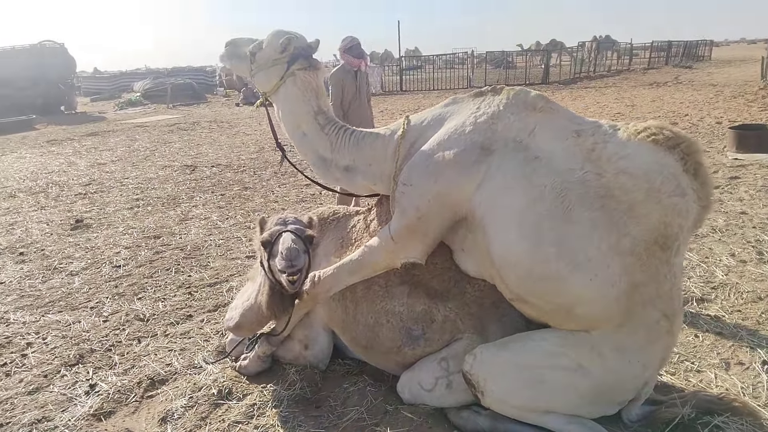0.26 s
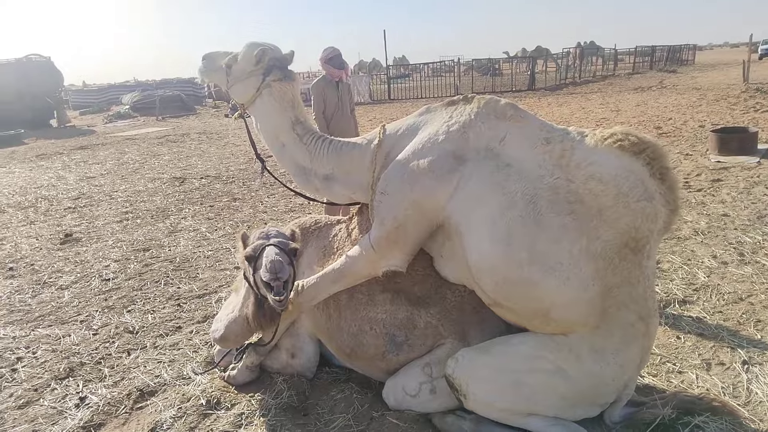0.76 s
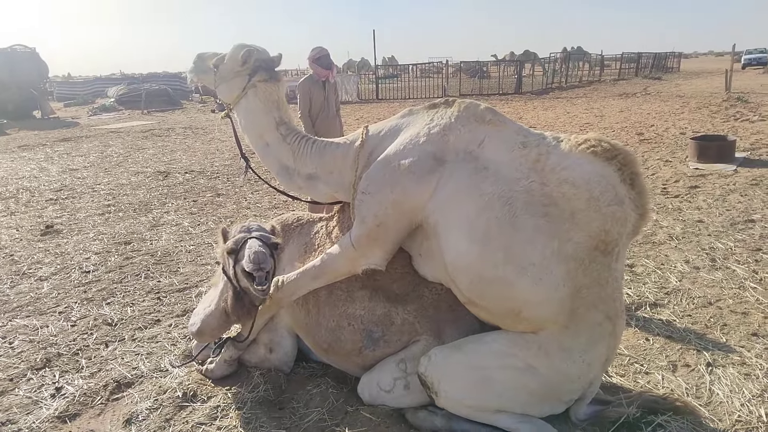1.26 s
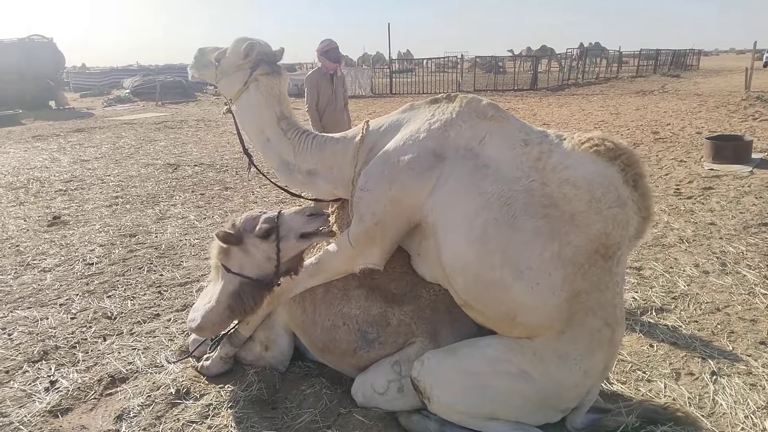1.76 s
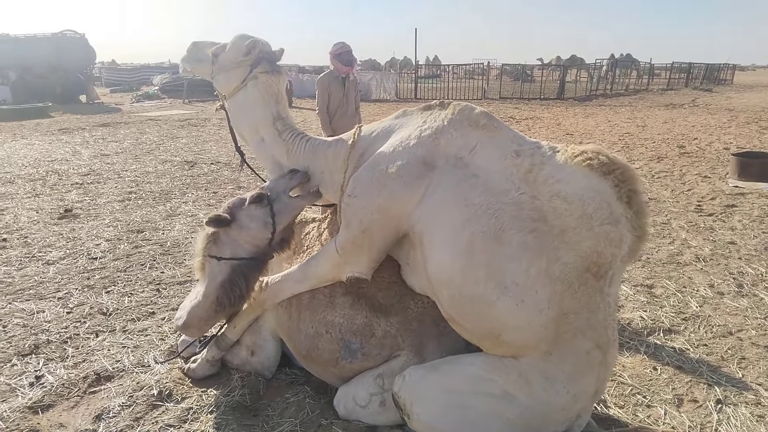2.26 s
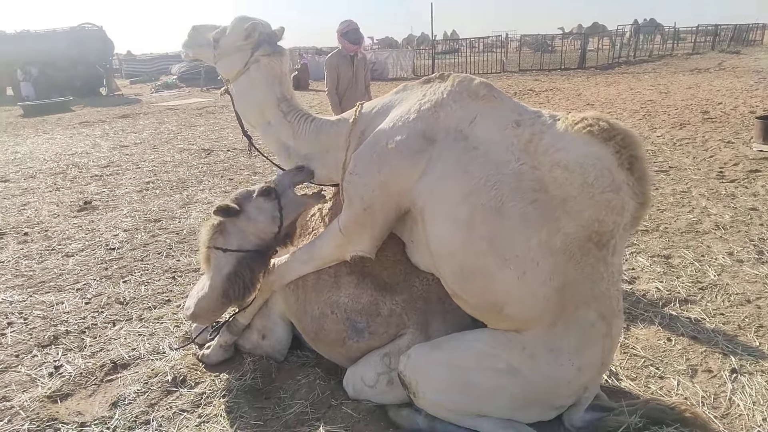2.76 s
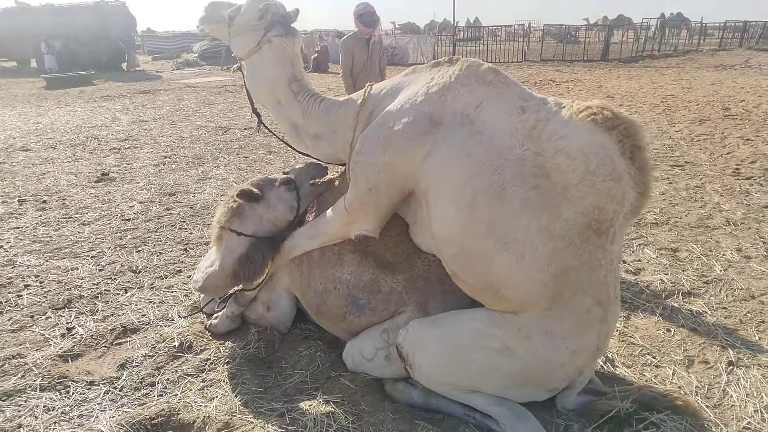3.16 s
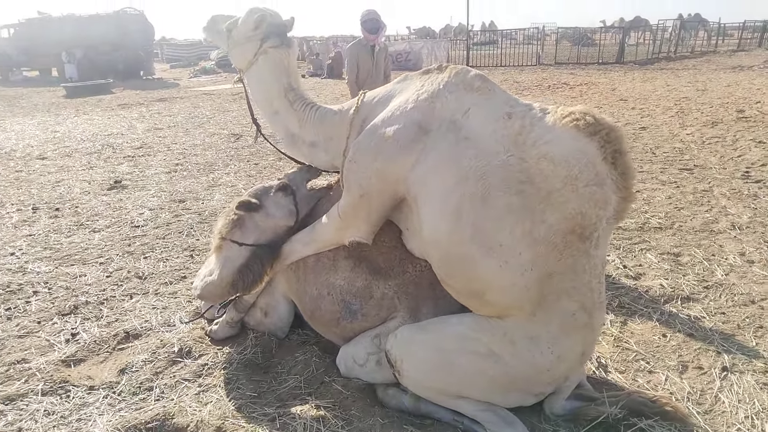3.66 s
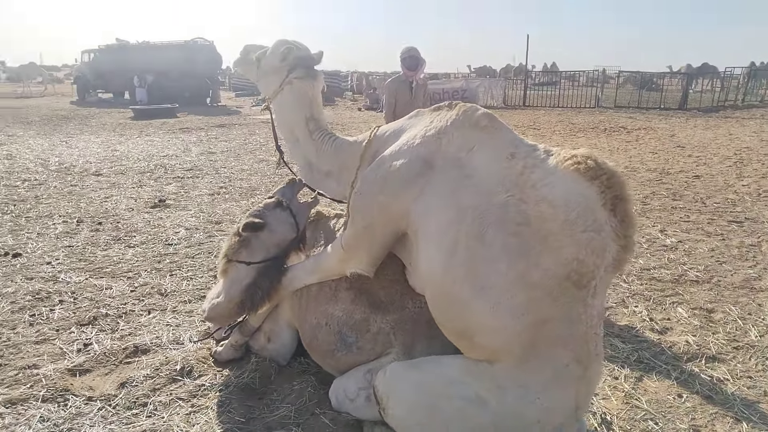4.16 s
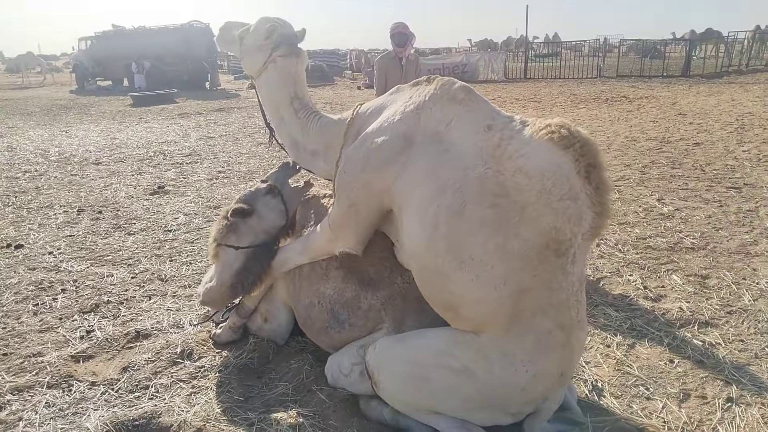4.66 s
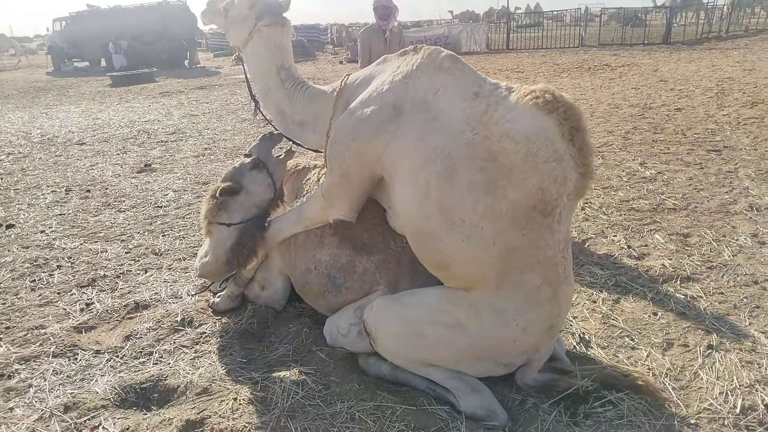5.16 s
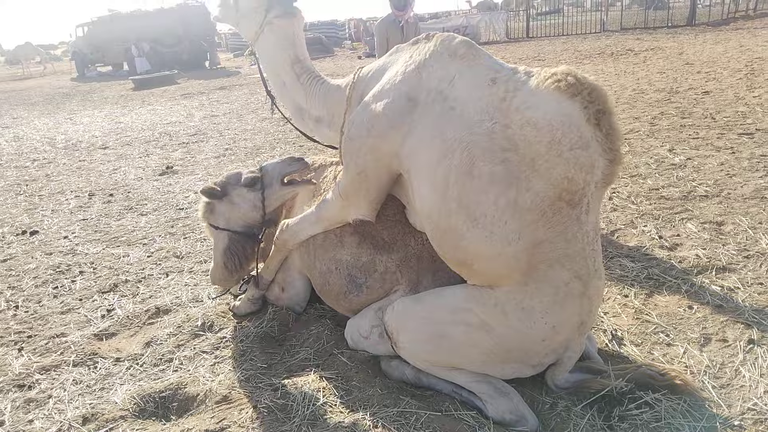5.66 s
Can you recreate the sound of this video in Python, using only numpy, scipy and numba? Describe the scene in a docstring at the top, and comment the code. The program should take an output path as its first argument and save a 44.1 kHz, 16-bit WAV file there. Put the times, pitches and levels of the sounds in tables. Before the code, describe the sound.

Gusty wind rumbles and thumps on the microphone in a dry, open pen. A few steps away a camel lets out a loud, coarse bellow that sinks into a slow creak. After a pause it grunts, rattles quietly in pulses, then moans, swelling into a loud bray. Faint lip ticks, nostril hisses and two tiny tooth squeaks come in between.

```python
"""Gusty wind buffets the microphone; then, a few steps away in a dry, open pen, a camel bellows,
creaks, grunts, rattles and moans. Slow slaps of its vocal folds ring a long throat whose shape
changes with the mouth. Teeth squeak twice, wet lips tick, nostrils hiss and something scuffs the
straw. Sand and bodies scatter a short echo, and the open air rushes faintly behind it all."""
import sys
import numpy as np
from scipy import signal
from scipy.fft import rfft, irfft, next_fast_len
from scipy.io import wavfile
from scipy.ndimage import uniform_filter1d, map_coordinates
from numba import njit

SR = 44100
rng = np.random.default_rng(int(sys.argv[2]) if len(sys.argv) > 2 else 0)


def dump_mix(stems):
    """Bounce the given channels to the path in sys.argv[1] as a 16-bit WAV at rate SR."""
    frames = np.atleast_2d(stems).T  # one column per channel
    limited = np.clip(frames, -1, 1)  # hard clip at full scale
    pcm = np.round(limited * 32767).astype(np.int16)
    wavfile.write(sys.argv[1], SR, pcm)


N = 260190
TIME_S = np.arange(N) / SR


def amp(db):
    """Decibels to gain."""
    return 10 ** (np.asarray(db) / 20)


def unit(x):
    """Scaled to rms 1."""
    return x / np.sqrt(np.mean(x ** 2) + 1e-20)


def curves(rows):
    """One value per sample for each column after the time."""
    times_s, *columns = np.transpose(rows)
    return [np.interp(TIME_S, times_s, column) for column in columns]


def plateau(start_s, end_s, edge_s):
    """1 from start to end, with a linear ramp outside each."""
    return np.interp(TIME_S, [start_s - edge_s, start_s, end_s, end_s + edge_s], [0, 1, 1, 0])


def wobble(rate_hz):
    """A smooth random curve, rate_hz knots a second."""
    return map_coordinates(rng.standard_normal(int(N * rate_hz / SR) + 4), [TIME_S * rate_hz])


def coloured(x, spectrum):
    """x through (Hz, dB) points joined on a log axis."""
    size = next_fast_len(N + 8192)
    hz, db = np.transpose(spectrum)
    gain = amp(np.interp(np.log(np.fft.rfftfreq(size, 1 / SR) + 1), np.log(hz + 1), db))
    return irfft(rfft(x, size) * gain, size)[..., :N]


def noise(spectrum):
    """Coloured noise at rms 1."""
    return unit(coloured(rng.standard_normal(N), spectrum))


@njit
def resonate(x, hz, width_hz):
    """A sharp band-pass, then a broader one that steepens its skirts; retuned every 32 samples."""
    y, z = np.zeros(len(x)), np.zeros(len(x))
    r = q = c = 0.
    for n in range(2, len(x)):
        if n == 2 or n % 32 == 0:
            r = np.exp(-np.pi * width_hz[n] / SR)
            q = r ** 2.2
            c = 2 * np.cos(2 * np.pi * hz[n] / SR)
        y[n] = (1 - r) * (x[n] - x[n - 2]) + r * c * y[n - 1] - r * r * y[n - 2]
        z[n] = (1 - q) * (y[n] - y[n - 2]) + q * c * z[n - 1] - q * q * z[n - 2]
    return z


# Air rush. Each row: frequency in Hz, relative density in dB.
AIR_SPECTRUM = [(180, -33.5), (300, -9), (1020, -15.5), (4170, -28), (5370, -39), (9170, -27.5),
                (10500, -45.5)]
# Its swell. Each row: time in seconds, level in dB.
AIR_LEVELS = [(0, -73), (.6, -69.5), (1.6, -84), (2.45, -73), (2.7, -78.5), (3.4, -64.5), (3.8, -65),
              (4.3, -63.5), (5.1, -71.5), (5.9, -66)]


def open_air():
    """The faint rush of open air, in patches of random strength."""
    bins = signal.stft(rng.standard_normal(N), nperseg=512)[2]
    patches = uniform_filter1d(rng.standard_normal(bins.shape), size=8, axis=0)
    patches = uniform_filter1d(patches, size=12, axis=1)
    patchy = signal.istft(bins * amp(2 * unit(patches)), nperseg=512)[1][:N]
    return amp(curves(AIR_LEVELS)[0]) * unit(coloured(patchy, AIR_SPECTRUM))


# Buffeting between gusts. Each row: time in seconds, level in dB.
WIND_LEVELS = [(0, -31.5), (.29, -39), (.5, -40), (.9, -34), (1.38, -38.5), (1.85, -37.5), (2.15, -44.5),
               (2.55, -40.5), (3.1, -39.5), (3.33, -68), (3.74, -41.5), (4.25, -45), (4.6, -40.5),
               (4.95, -34), (5.15, -49.5), (5.36, -55), (5.66, -34.5), (5.9, -34.5)]
# Gusts. Each row: peak time in seconds, level in dB.
GUSTS = [(.13, -25), (0.348, -21), (1.02, -25.5), (1.741, -26), (2.018, -36), (2.22, -30), (2.392, -33),
         (2.685, -31), (2.756, -30), (2.83, -34), (3.818, -25), (4.01, -21), (4.144, -27.5), (4.54, -29),
         (4.63, -34), (4.778, -23.5), (4.881, -27), (4.962, -25), (5.252, -24)]
# Wind on the port. Each row: frequency in Hz, relative density in dB.
RUMBLE_SPECTRUM = [(12, -37), (28, -15), (50, -4.5), (75, -4.5), (130, -8), (250, -23), (500, -60),
                   (1000, -78.5)]
FLAP_SPECTRUM = [(60, -63), (150, -11), (250, 0), (450, -13.5), (800, -36.5), (1500, -37.5), (4000, -100)]


def wind(rise_db_per_s=292, fall_db_per_s=282.5):
    """Lumpy rumble on the microphone port; strong gusts flap brighter."""
    level_db = curves(WIND_LEVELS)[0]
    for peak_s, peak_db in GUSTS:
        since_s = TIME_S - peak_s
        slope = np.where(since_s < 0, rise_db_per_s, -fall_db_per_s)
        level_db = np.maximum(level_db, peak_db + slope * since_s)
    lumps_db = 6.5 * np.tanh(wobble(25))
    rumble = amp(level_db + .5 + lumps_db) * noise(RUMBLE_SPECTRUM)
    flap_db = 1.2 * level_db - 7.6 + lumps_db + 7 * np.tanh(wobble(60))
    return rumble + amp(flap_db) * noise(FLAP_SPECTRUM)


# Sharp eddies. Each row: centre in seconds, level in dB, thump frequency in Hz, crack weight in dB.
EDDIES = [(0.032, -15, 103.6, -43), (0.088, -14, 196, -5.5), (0.104, -24, 170, -1.5), (0.133, -14, 295, -5),
          (0.328, -20.5, 170, -10), (0.344, -18.5, 89.5, -5.5), (.369, -14.5, 68.6, -17),
          (1.02, -19, 221.8, -4.5), (1.218, -17.5, 139, -43), (1.739, -19, 188.3, -2.5),
          (2.004, -23, 150, -19.5), (2.247, -20.5, 109, -29), (2.323, -22, 114, -27),
          (2.647, -20, 191, -28.5), (2.685, -17.5, 160, -27.5), (3.832, -14, 171, -19),
          (3.998, -16.5, 200.1, -13), (4.795, -16.5, 145.4, -34), (4.97, -14, 174, -41),
          (5.23, -20, 150, -7), (5.258, -21.5, 203, 4), (5.638, -18, 160, -15)]


def eddies(crack_hz=430):
    """Single eddies suck the microphone membrane back: a thump with a narrower crack in it."""
    half = SR // 40
    out, t = np.zeros(N + SR), np.arange(-half, half) / SR
    dip = lambda u: (2 * u ** 2 - 1) * np.exp(-u ** 2)
    for centre_s, db, hz, crack_db in EDDIES:
        pulse = dip(np.pi * hz * t) + amp(crack_db - 3) * dip(np.pi * crack_hz * t)
        out[round(centre_s * SR):][:len(t)] += amp(db) * pulse
    return out[half:][:N]


def ground_echo(x, rt60_s=.07, gain_db=-13):
    """Sand and bodies scatter a short, weak tail."""
    t = np.arange(SR // 10) / SR
    tail = rng.standard_normal(len(t)) * amp(-60 * t / rt60_s)
    return amp(gain_db) * signal.fftconvolve(x, tail / np.linalg.norm(tail))[:N]


# Straw, nostril and lip hisses. Each row: centre in seconds, half length in seconds, level in dB.
SCUFFS = [(.34, 0.074, -62)]
SNORTS = [(0.27, 0.19, -64), (4.224, 0.33, -64)]
RASPS = [(1.44, 0.054, -62), (3.6, 0.086, -73)]
# Their colours. Each row: frequency in Hz, relative density in dB.
STRAW_SPECTRUM = [(700, -20), (1300, 13.5), (3000, 6), (5000, -27)]
NOSE_SPECTRUM = [(3000, -13.5), (3800, -10), (4500, -7.5), (5200, -4), (5800, -13), (6300, -19),
                 (10000, -30)]
LIP_SPECTRUM = [(4000, -11), (6800, -8), (8800, -9), (10000, -16.5)]


def hiss(swells, spectrum):
    """Scuffed straw, or air through nostrils or wet lips: soft noise that swells and fades."""
    swell = sum(amp(db) * np.exp(-((TIME_S - at_s) / half_s) ** 2) for at_s, half_s, db in swells)
    flutter = amp(2 * wobble(70))
    return swell * flutter * noise([(20, -94.5)] + spectrum)


# Wet ticks. Each row: start in seconds, level in dB, frequency in Hz.
LIP_TICKS = [(0.49, -47.5, 2370), (2.096, -40.5, 1120), (3.16, -41.5, 8500), (4.047, -39.5, 1920),
             (4.097, -39.5, 1610)]


def lip_ticks(decay_cycles=3.42):
    """Wet lips tick, each time a few quickly dying cycles."""
    out, t = np.zeros(N), np.arange(SR // 40) / SR
    for start_s, db, hz in LIP_TICKS:
        envelope = (1 - np.exp(-hz * t)) * np.exp(-hz * t / decay_cycles)
        out[round(start_s * SR):][:len(t)] += amp(db) * envelope * np.sin(2 * np.pi * hz * t)
    return out


# Squeaks. Each row: start in seconds, level in dB, frequency in Hz, rise and length in seconds.
TOOTH_SQUEAKS = [(4.996, -38, 2866, 0.0011, 0.014), (5.071, -39.5, 3020, 0.0033, 0.012)]


def teeth():
    """Molars slip on each other with a short, pure squeak."""
    out, t = np.zeros(N), np.arange(SR // 20) / SR
    for start_s, db, hz, rise_s, length_s in TOOTH_SQUEAKS:
        envelope = np.clip(t / rise_s, 0, 1) * np.exp(-(t / length_s) ** 4)
        out[round(start_s * SR):][:len(t)] += amp(db) * envelope * np.sin(2 * np.pi * hz * t)
    return out


# Spans where the folds settle. Each row: start and end in seconds, roughness from 0 to 1.
STEADY_SPANS = [(.85, 1.03, .2), (1.06, 1.35, .06), (1.55, 2.2, .72), (2.99, 3.07, .2), (3.12, 3.2, .5),
                (3.43, 4.98, .17), (5.21, 5.55, .08), (5.64, 5.83, .1)]


def vocal_folds(pitch_hz, hoarse=.85, settle_s=.07, jitter=.2, scatter_db=6):
    """The folds slap and gate the air once a cycle; roughness unsettles timing and slap strength."""
    roughness = np.min([hoarse - (hoarse - settled) * plateau(start_s, end_s, settle_s)
                        for start_s, end_s, settled in STEADY_SPANS], axis=0)
    cycles = np.cumsum(pitch_hz * (1 + jitter * roughness * wobble(60))) / SR
    at = np.flatnonzero(np.diff(np.floor(cycles)))
    slaps = np.zeros(N)
    slaps[at] = amp(scatter_db * roughness[at] * wobble(90)[at]) * np.sqrt(SR / pitch_hz[at])
    phase = cycles % 1
    air_gate = unit(.15 + np.sqrt(phase) * np.exp(-5 * phase))
    return slaps, air_gate, roughness


def breathy(slaps, air_gate, air_share):
    """Slaps blended by power with the air that rushes through the folds."""
    return np.sqrt(1 - air_share) * slaps + np.sqrt(air_share) * air_gate * rng.standard_normal(N)


# Throat and mouth shapes, nine resonances each.
# Each row: frequency in Hz, width in Hz before clipping, relative level in dB.
GAPE = [(818, 63, 7.5), (1107, 990, -2.5), (2028, 98, 13.5), (2750, 340, 5.5), (3560, 300, -9),
        (4040, 250, -8), (5470, 870, -21), (6660, 220, -22), (8500, 510, -38)]
SWELL = [(860, 81, 3.5), (1320, 700, -4.5), (1972, 70, 8), (2377, 120, 4), (3300, 900, -12),
         (4400, 420, -26), (5600, 1600, -31.5), (8120, 400, -30.5), (9070, 190, -26)]
ROAR = [(1056, 303, 2.5), (1420, 500, -7.5), (1915, 113, 11), (2446, 158, 3), (3400, 1100, -12.5),
        (4300, 250, -19), (5660, 990, -26.5), (7300, 750, -29.5), (8810, 140, -24.5)]
CREAK = [(870, 170, 29), (1474, 68, 21), (1722, 1300, 6.5), (3020, 1500, 1.5), (3346, 250, -35),
         (4100, 680, -10.5), (5200, 360, -60), (6270, 600, -63), (8600, 600, -44)]
GRUNT = [(604, 193, -10.5), (1053, 69, -6), (1317.6, 96, -5.5), (1712, 90, -11), (2324.5, 164, -15.5),
         (2800, 190, -25.5), (3830, 450, -28), (4900, 180, -35), (7300, 1440, -43)]
MOAN = [(724.5, 112, -9.5), (1037, 66, -13), (1632.3, 127, -10), (2400, 207, -36), (2629, 63, -41.5),
        (3964, 150, -36.5), (4600, 90, -45.5), (6900, 660, -65), (8900, 290, -60)]
HUM = [(805, 190, 4), (1016, 105, 11), (1654, 74, 16), (2240, 148, 4), (2778, 89, -2), (3510, 550, -12.5),
       (4770, 200, -19), (7200, 263, -32), (8580, 430, -33.5)]
BRAY = [(885.4, 90.7, 15), (1184, 76.5, 9), (1675.5, 101, 17.5), (2370, 196, -3), (3010, 200, -18.5),
        (3680, 170, -18.5), (4810, 300, -21), (6600, 560, -44.5), (9170, 440, -28.5)]
# Moves to the next shape. Each row: start in seconds, glide in seconds.
MOUTH_MOVES = [(.95, .07), (1.1, .17), (1.41, .1), (2.5, .1), (3.97, .03), (5.11, .03), (5.612, .01)]
# Lowest resonance, rising in the creak. Each row: time in seconds, frequency ratio (end values hold).
LOWEST_BEND = [(1.5, 1.06), (1.56, 0.95), (1.78, 1.14), (1.98, 1.08)]


def mouth_resonances():
    """Yields each resonance's frequency, width and level as the mouth glides from shape to shape."""
    shapes = [GAPE, SWELL, ROAR, CREAK, GRUNT, MOAN, HUM, BRAY]
    place = sum(np.clip((TIME_S - start_s) / glide_s, 0, 1) for start_s, glide_s in MOUTH_MOVES)
    for k, mode in enumerate(np.transpose(shapes, (1, 2, 0))):
        hz, width_hz, db = [np.interp(place, np.arange(len(shapes)), column) for column in mode]
        if k == 0:
            hz *= curves(LOWEST_BEND)[0]
        yield hz, np.clip(width_hz, 75, 700), db


# Resonance accents. Each row: start in seconds, hold in seconds, centre in Hz, gain in dB.
ACCENTS = [(0.754, 0.064, 2100, -19), (0.751, 0.04, 3200, -19), (3.441, 0.11, 2260, 9.5),
           (3.476, 0.25, 4900, 10), (4.505, 0.3, 4300, 21.5), (4.687, 0.19, 2400, 18),
           (5.336, 0.051, 7980, 27.5), (5.501, 0.038, 7826, 22.5), (5.765, 0.077, 2400, 13.5),
           (5.797, .05, 1664, -10), (5.737, 0.14, 6817, 19.5)]


def accent_db(hz, edge_s=.03, reach_octaves=.22):
    """Resonances near one frequency open up or close for a moment."""
    total_db = np.zeros(N)
    for start_s, hold_s, centre_hz, db in ACCENTS:
        nearness = np.exp(-(np.log2(hz / centre_hz) / reach_octaves) ** 4)
        total_db += db * nearness * plateau(start_s, start_s + hold_s, edge_s)
    return total_db


# Hard single slaps. Each row: time in seconds, relative level in dB.
HARD_SLAPS = [(0.848, -28.5), (0.905, -29), (0.942, -30), (0.976, -37), (5.862, -30)]


def mouth(slaps, air_gate, roughness, level):
    """Slaps and air ring throat and mouth; every resonance flickers as wet tissue moves."""
    hard_slaps, out, power = np.zeros((3, N))
    for at_s, db in HARD_SLAPS:
        hard_slaps[round(at_s * SR)] = amp(db + 29)
    for k, (hz, width_hz, db) in enumerate(mouth_resonances()):
        # Higher resonances are hoarser.
        air_share = np.clip(roughness * (1 + .1 * k) + min(.006 * k ** 2, .2), 0, .95)
        flicker_db = (1.3 + .4 * k + 3 * roughness) * wobble(14)
        flesh = np.hanning(int(1.3 * SR / hz.max()) + 2)  # softens each slap
        drive = level * breathy(slaps, air_gate, air_share) + hard_slaps
        softened = np.convolve(drive, 1.33 * flesh / flesh.sum(), 'same')
        ringing = resonate(softened, hz * (1 + .014 * wobble(12)), width_hz)
        polarity = (-1) ** max(k, 1)
        out += polarity * amp(db + accent_db(hz) + flicker_db) * ringing
        power += amp(2 * db) * width_hz * np.pi / SR
    return out / np.sqrt(power)


# One list per call: bellow, creak, grunt, rattle, moan. Each row: time in seconds, pitch in Hz,
# mouth level in dB, neck resonance in Hz, relative neck level in dB.
CALLS = [
    [(.77, 80, -46, 390, -45), (.812, 64.5, -39.5, 360, -36.5), (.85, 53.38, -38, 332, -46),
     (.96, 53.82, -38, 305, -34), (.99, 83.45, -30, 313, -43), (1.12, 86.6, -28.5, 338, -39),
     (1.23, 95.4, -23, 408, -39.5), (1.31, 91.6, -21, 420, -40.5), (1.37, 68.4, -29.5, 322, -31.5),
     (1.43, 61.2, -37.5, 336.8, -67), (1.515, 39.76, -50, 336, -73)],
    [(1.52, 39.37, -46.5, 341, -90), (1.6, 33.04, -46.5, 339.2, -89), (1.96, 37.94, -51, 348, -82),
     (2.07, 36.32, -62.5, 343, -87)],
    [(2.85, 142, -67.5, 315.4, -88), (2.965, 143, -66.5, 313.7, -77), (2.99, 150.3, -41, 312, -31.5),
     (3.055, 148.7, -41.5, 284, -22), (3.09, 134.5, -47.5, 286, -34), (3.115, 96.1, -38.5, 277.2, -20.5),
     (3.17, 74.86, -41, 233, -22.5), (3.25, 61.5, -52, 220, -42), (3.31, 61.5, -68, 215.7, -75)],
    [(3.44, 61.1, -56.5, 217.3, -46), (3.53, 59.1, -63.5, 215, -31), (3.63, 60.1, -54, 233.2, -39.5),
     (3.85, 61.77, -62.5, 258, -32.5), (4.2, 60.05, -56.5, 238, -38.5), (4.42, 62.37, -55, 248, -32),
     (4.6, 62.96, -58.5, 246, -44), (4.87, 65.07, -51.5, 223, -36.5), (5.0, 61.58, -53.5, 225.7, -33.5),
     (5.12, 62.54, -61, 225, -48)],
    [(5.13, 64, -58.5, 238, -38.5), (5.25, 72.68, -45.5, 251.2, -35), (5.34, 73.28, -42.5, 224.2, -30.5),
     (5.56, 70.22, -41, 231.7, -36), (5.62, 75.8, -36.5, 246, -30), (5.68, 79.42, -21.5, 254.9, -24),
     (5.73, 84, -23, 262.5, -23), (5.8, 75.98, -25, 251.5, -26), (5.85, 74.6, -33.5, 238.4, -36),
     (5.9, 73.2, -52, 230.6, -70)],
]
# Shoves that push the rattle out louder. Each row: start in seconds, hold in seconds, mouth gain in dB.
HEAVES = [(3.453, 0.11, 7), (3.71, 0.013, 5.5), (3.841, 0.08, 14.5), (4.016, 0.056, 6.5),
          (4.169, 0.015, 12), (4.35, 0.1, 11.5), (4.833, 0.15, 8.5)]


def camel(neck_heave_share=.16):
    """The vocal folds drive the mouth and one low neck resonance through five calls."""
    pitch_hz, mouth_db, neck_hz, neck_db = curves(sum(CALLS, []))
    slaps, air_gate, roughness = vocal_folds(pitch_hz)
    sounding = np.max([plateau(call[0][0], call[-1][0], edge_s=.02) for call in CALLS], axis=0)
    heave_db = np.max([db * plateau(at_s, at_s + hold_s, edge_s=.028)
                       for at_s, hold_s, db in HEAVES], axis=0)
    voice = mouth(slaps, air_gate, roughness, level=sounding * amp(mouth_db + heave_db))
    neck_level = sounding * amp(neck_db + neck_heave_share * heave_db + 19)
    neck_drive = neck_level * breathy(slaps, air_gate, air_share=.37 * roughness)
    return voice + resonate(neck_drive, neck_hz, .22 * neck_hz)


def scene():
    """Animal, straw, their scattered echo, wind and air, in mono."""
    near = camel() + teeth() + lip_ticks()
    near += hiss(SCUFFS, STRAW_SPECTRUM) + hiss(SNORTS, NOSE_SPECTRUM) + hiss(RASPS, LIP_SPECTRUM)
    return (near + ground_echo(near) + wind() + eddies() + open_air())[None]


# Microphone response. Each row: frequency in Hz, gain in dB.
MIC_RESPONSE = [(100, 0), (9500, 9), (10600, 1.5)]


def record(dry, limit_hz=10640):
    """The microphone lifts the treble, then rolls off and cuts steeply at its band limit."""
    return coloured(coloured(dry, MIC_RESPONSE), [(limit_hz, 0), (limit_hz + 20, -70)])


dry = scene()
out = record(dry)
dump_mix(out)
```